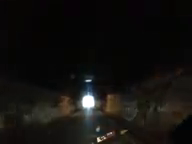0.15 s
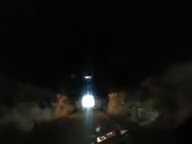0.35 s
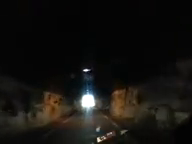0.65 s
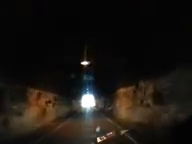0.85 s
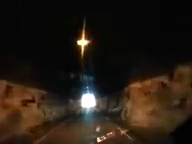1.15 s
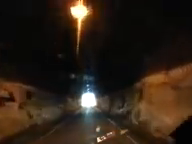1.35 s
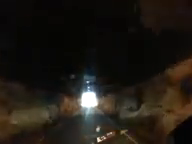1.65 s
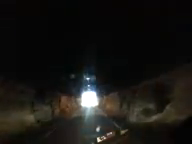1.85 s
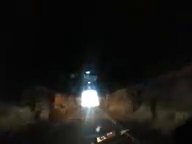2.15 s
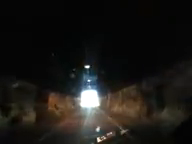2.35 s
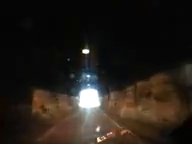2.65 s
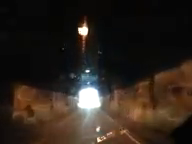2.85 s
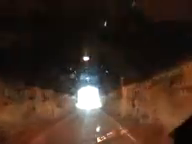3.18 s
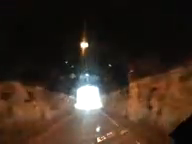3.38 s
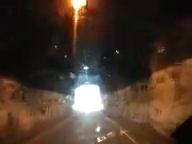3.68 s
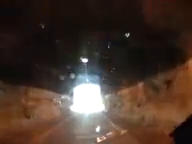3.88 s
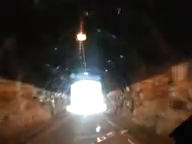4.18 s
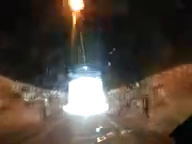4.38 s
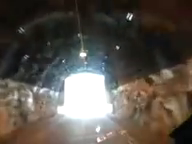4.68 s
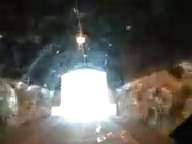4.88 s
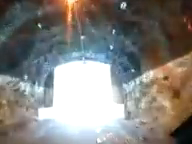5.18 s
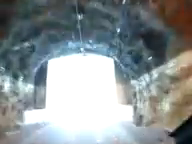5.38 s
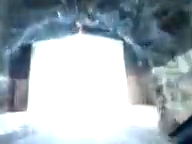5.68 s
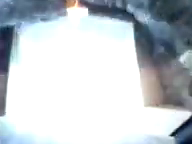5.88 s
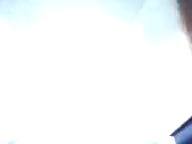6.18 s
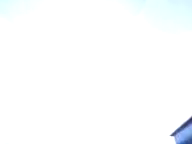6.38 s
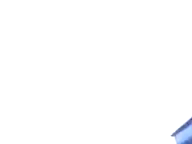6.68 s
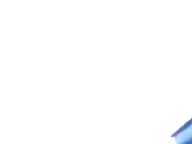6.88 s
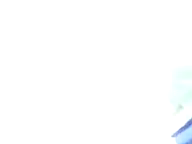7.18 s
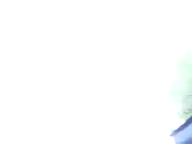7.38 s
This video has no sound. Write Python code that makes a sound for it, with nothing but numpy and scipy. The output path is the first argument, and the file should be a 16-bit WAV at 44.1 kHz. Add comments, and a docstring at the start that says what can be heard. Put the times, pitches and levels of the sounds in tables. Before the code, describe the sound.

Inside a car driving through a road tunnel, tyres rumble and the engine drones, easing off and picking up, with a few bumps and knocks.

```python
"""Tyres on coarse asphalt, heard inside a car in a road tunnel: the body booms and the tread rushes. The engine
drones, drops away as the driver lifts off, then picks up; late on, the cabin rings louder. Meshing gear teeth
add a thin whine, and stones pop under the tyres. Bumps thump through the body and knock something loose. The
plastic trim ticks and bits of metal jingle over a faint hiss."""
import sys
import numpy as np
from scipy import signal
from scipy.fft import rfft, irfft, next_fast_len
from scipy.io import wavfile
from scipy.ndimage import map_coordinates

SR = 44100
rng = np.random.default_rng(int(sys.argv[2]) if len(sys.argv) > 2 else 0)


def master(y):
    """Save y as 16-bit WAV."""
    cut = np.clip(np.atleast_2d(y).T, -1, 1)
    pcm = np.round(cut * 32767)  # scale
    wavfile.write(sys.argv[1], SR, pcm.astype(np.int16))


N = 332504
EASE_S = 3.26  # when the road noise and gear whine begin to fade and the hiss begins to rise


def amp(db):
    """Turn decibels into a gain. A fade of amp(-60 * t / t60) loses 60 dB in t60 seconds."""
    return 10 ** (np.asarray(db) / 20)


def unit(x):
    """Scale a signal to an average (rms) level of 1."""
    return x / np.sqrt(np.mean(x ** 2) + 1e-20)


def along(points, hz):
    """Read between (Hz, value) points on a logarithmic frequency scale."""
    freqs, values = np.transpose(points)
    return np.interp(np.log(hz + 1), np.log(freqs + 1), values)


def curves(rows):
    """Join rows that begin with a time into one curve for each further column."""
    times, *columns = np.transpose(rows)
    return [np.interp(np.arange(N) / SR, times, column) for column in columns]


def wobble(rate):
    """A smooth random curve that passes through `rate` new values a second."""
    values = rng.standard_normal(int(N * rate / SR) + 4)
    return map_coordinates(values, [np.arange(N) * rate / SR])


def ramp(start_s, length_s):
    """Rise from 0 at start_s to 1 over length_s."""
    return np.clip((np.arange(N) / SR - start_s) / length_s, 0, 1)


def add(track, start_s, sound):
    """Mix a short sound into a track."""
    part = track[..., round(start_s * SR):][..., :sound.shape[-1]]
    part += sound[..., :part.shape[-1]]


def filtered(x, response):
    """Filter x with a response: a function that gives the gain at each frequency."""
    size = next_fast_len(N + SR // 2)
    return irfft(rfft(x, size) * response(np.fft.rfftfreq(size, 1 / SR)), size)[..., :N]


def colour(points):
    """A response drawn through (Hz, dB) points."""
    return lambda hz: amp(along(points, hz))


def resonances(peaks):
    """A response with a steep-sided peak for each (centre Hz, width Hz, dB)."""
    return lambda hz: sum(amp(db) / (1 + ((hz - mid) / width) ** 2) ** 1.5 for mid, width, db in peaks)


# How alike left and right sound. Each row: frequency in Hz, likeness (1 the same, -1 opposite).
LIKENESS = [(50, 1), (110, 0.89), (220, 0.55), (310, 0.77), (500, 0.57), (720, 0.34), (900, 0.11),
            (1100, -0.14), (1380, -0.44), (1800, -0.43), (2300, 0.039), (3000, 0.048), (3800, -0.023)]

def cabin(pair, response):
    """Filter two unrelated signals and blend them into sound that fills the cabin, left and right."""
    def blend(hz):
        angle = np.arccos(np.clip(along(LIKENESS, hz), -1, 1)) / 2
        return response(hz) * np.array([np.cos(angle), np.sin(angle)])
    mid, side = filtered(pair, blend)
    return np.array([mid + side, mid - side])


def rush(response, drive=1):
    """Stereo cabin noise, shaken by drive, with an average level of 1."""
    return unit(cabin(drive * rng.standard_normal((2, N)), response))


def burst(envelope, spectrum):
    """Noise shaped in time and then filtered, so its edges are as dull as the rest."""
    response = colour(spectrum)
    average_gain = np.sqrt(np.mean(response(np.linspace(0, SR / 2, 4096)) ** 2))
    return cabin(envelope * rng.standard_normal((2, N)), response) / average_gain


# The tone of the hiss. Each row: frequency in Hz, relative level in dB.
HISS_TONE = [(3000, 0), (6200, -11.5), (7800, -3), (9500, -1), (14500, -2.5)]

def hiss(db=-60.0, rise_db=2.5, rise_s=0.97):
    """A faint, high hiss comes up a little as the road noise eases."""
    return amp(db + rise_db * ramp(EASE_S, rise_s)) * rush(colour(HISS_TONE))


# Shivers of metal. Each row: start in seconds, level in dB, rise time and fade time in seconds.
JINGLES = [(2.225, -57, .012, .2), (2.655, -54, 0.0055, 0.18), (3.899, -56.5, 0.0022, .06),
           (4.245, -46.5, 0.034, 0.39), (6.995, -49.5, 0.014, 0.23)]
# Their bright ring. Each row: frequency in Hz, relative level in dB.
METAL_TONE = [(3000, -30), (5500, -7), (8500, 1), (11500, -1), (14500, -6)]

def jingle(grain_db=4):
    """Small metal pieces shiver in a spray of tiny contacts when the car is shaken."""
    shake, t = np.zeros(N), np.arange(SR // 2) / SR
    for start_s, db, rise_s, t60 in JINGLES:
        add(shake, start_s, amp(db - 60 * t / t60) * (1 - np.exp(-t / rise_s)) ** 2)
    return burst(shake * amp(grain_db * wobble(350)), METAL_TONE)


def chink(start_s=7.021, hz=7720, width_hz=380, db=-48, t60=0.07):
    """A small piece of metal chinks along with the second knock."""
    envelope, t = np.zeros(N), np.arange(SR // 4) / SR
    add(envelope, start_s, amp(db - 60 * t / t60) * (1 - np.exp(-t / 0.00098)))
    return envelope * rush(resonances([(hz, width_hz, 0)]))


# Ticks of the trim. Each row: start in seconds, relative level in dB, pitch in Hz.
TRIM_TICKS = [(2.66, -47, 3700), (3.104, -29.5, 2050), (3.106, -48, 4500), (3.695, -37, 2900),
              (3.711, -30, 2180), (3.901, -48, 3700), (4.221, -30, 1900), (4.354, -40, 3200),
              (4.44, -27.5, 2420), (4.499, -49, 3600), (5.153, -44, 3800), (5.484, -43, 3300),
              (6.431, -31.5, 2050), (7.025, -35.5, 2920), (7.343, -39, 3220), (7.446, -32, 2450),
              (7.504, -31, 1900), (7.522, -40, 3200)]

def ticks(gain_db=-3, t60=0.039, spread=0.99):
    """Plastic trim slips in brief bursts, each a ringing band of noise over a woody low end."""
    out, t = np.zeros((2, N)), np.arange(SR // 8) / SR
    for start_s, db, hz in TRIM_TICKS:
        cut_highs = signal.butter(6, hz * 1.23, fs=SR)
        cut_lows = signal.butter(1, hz / 2, "highpass", fs=SR)
        band = signal.butter(2, [hz / 1.11, hz * 1.11], "bandpass", fs=SR)
        centre = rng.standard_normal((2, 1, len(t)))  # the same in both ears
        sides = spread * rng.standard_normal((2, 2, len(t)))
        scrape = signal.lfilter(*cut_highs, centre + sides)
        woody = unit(signal.lfilter(*cut_lows, scrape[0]))
        ring = unit(signal.lfilter(*band, scrape[1]))
        envelope = amp(db + gain_db - 60 * t / t60) * (1 - np.exp(-t / 0.00058))
        add(out, start_s, (woody + ring) * envelope)
    return out


# Knocks. Each row: start in seconds, level in dB, pitch multiplier, treble cut-off in Hz.
KNOCKS = [(4.2766, -13, 0.96, 3800), (7.019, -16, .87, 776)]
# The loose object's notes. Each row: pitch in Hz, relative level in dB, fade time in seconds.
OBJECT_NOTES = [(362, -9, 0.12), (694, -9.5, 0.076), (815, -4.5, 0.11), (876, -2.5, 0.093),
                (1225, -6.5, 0.057), (1476, -8.5, 0.051), (2130, -16, 0.04), (2450, -16, 0.043),
                (3150, -24, .04)]
# The dull crack of a contact. Each row: frequency in Hz, relative level in dB.
CRACK_TONE = [(30, -40), (200, -4), (900, 2.5), (2300, -7.5), (4000, -21), (6000, -30), (12000, -28)]

def knocks(ring_db=-2.5, crack_db=-7, crack_t60=0.063, gap_s=0.0036, gap_growth=3.1, loss_db=11):
    """A loose object hits the trim three times a knock, ringing and cracking; soft hits sound rounder."""
    out, t = np.zeros((2, N)), np.arange(SR // 4) / SR
    attack = (1 - np.exp(-t / 0.00078)) ** 2
    for start_s, first_db, ratio, cutoff_hz in KNOCKS:
        ring, cracks = np.zeros((2, N)), np.zeros(N)
        for hit in range(3):
            hit_s = start_s + gap_s * np.sum(gap_growth ** np.arange(hit))
            hit_db = first_db - loss_db * hit
            for hz, note_db, t60 in OBJECT_NOTES:
                phase = 2 * np.pi * hz * ratio * (t + hit_s - start_s) + rng.normal(0, 0.21, (2, 1))
                add(ring, hit_s, amp(hit_db + note_db - 60 * t / t60) * attack * np.sin(phase))
            add(cracks, hit_s, amp(hit_db + crack_db - 60 * t / crack_t60))
        rattle = amp(ring_db) * ring + burst(cracks, CRACK_TONE)
        out += signal.lfilter(*signal.butter(2, cutoff_hz, fs=SR), rattle)
    return out


# Bumps in the road. Each row: start in seconds, level in dB, fade time in seconds.
BUMPS = [(3.682, -25.5, 0.43), (4.276, -20.5, 0.73), (4.72, -31, 0.53), (6.718, -23, 0.088),
         (7.019, -23.5, 0.35)]
# The body's answer to a jolt. Each row: frequency in Hz, relative level in dB.
JOLT_TONE = [(30, -48), (60, -27), (115, -2.5), (190, -11.5), (280, -2), (400, -6), (540, -21),
             (900, -15.5), (2500, -32), (5000, -49.5), (12000, -74)]

def thumps(rear_delay_s=0.175, rear_db=-12):
    """Each bump jolts the front wheels, then the rear ones more softly, and the body booms."""
    jolts, t = np.zeros(N), np.arange(SR) / SR
    for start_s, db, t60 in BUMPS:
        jolt = amp(db - 60 * t / t60) * (1 - np.exp(-t / 0.00077))
        add(jolts, start_s, jolt)
        add(jolts, start_s + rear_delay_s, amp(rear_db) * jolt)
    return burst(jolts, JOLT_TONE)


# Stones the tyres hit. Each row: time in seconds, peak level in dB.
STONES = [(0.074, -19), (0.539, -19), (0.762, -26), (1.015, -23), (1.225, -19.5), (1.4935, -16.5),
          (1.964, -24), (2.173, -22), (2.842, -21), (3.635, -16), (5.282, -23), (5.544, -24), (6.438, -20),
          (7.012, -16)]
# The tone of one pop. Each row: frequency in Hz, relative level in dB.
POP_TONE = [(20, -41), (80, -13), (250, 3), (800, 5), (1400, -8), (3000, -20.5), (4500, -44), (7000, -68)]

def stones():
    """Single stones that stick up from the road pop under the tyres."""
    hits, pop = np.zeros(N), colour(POP_TONE)
    for hit_s, db in STONES:
        hits[round(hit_s * SR)] += amp(db)
    return filtered(hits, lambda hz: pop(hz) / pop(hz).mean())


# A cabin resonance, then a faint high whistle. Each row: pitch in Hz, width in Hz, level in dB.
RING_AND_WHISTLE = [(706, 11, -43), (2390, 50, -53.5)]

def ring_and_whistle(start_s=6.0, end_s=7.4, fade_s=0.11):
    """A cabin resonance rings louder, with a faint high whistle, from 6.0 s to 7.4 s."""
    notes = [amp(db) * rush(resonances([(hz, width, 0)])) for hz, width, db in RING_AND_WHISTLE]
    envelope = ramp(start_s, fade_s) * (1 - ramp(end_s - fade_s, fade_s))
    return envelope * sum(notes)


def whine(hz, db, waver_db, roughness):
    """Meshing gear teeth sing a thin, unsteady note."""
    phase = 2 * np.pi * np.cumsum(hz) / SR + roughness * wobble(30)
    return np.sqrt(2) * amp(db + waver_db * wobble(7)) * np.sin(phase)


# The gear note while coasting. Each row: time in seconds, pitch in Hz, level in dB.
COAST_NOTE = [(4.2, 541, -60), (4.33, 536, -34.5), (4.46, 531, -32), (4.56, 526, -42), (4.72, 520, -40.5),
              (5.0, 517, -36.5), (5.15, 504, -45), (5.4, 494.7, -39), (5.7, 475, -40), (6.4, 455.6, -46),
              (6.7, 450, -63)]

def gears(teeth_per_firing=9, drive_db=-44, release_s=0.65):
    """One note follows the engine, then fades; a lower one sags and fades as the car coasts."""
    firing_hz, = curves(ENGINE_SPEED)
    driving = whine(teeth_per_firing * firing_hz, drive_db, waver_db=4.0, roughness=0.4)
    coasting = whine(*curves(COAST_NOTE), waver_db=0.3, roughness=0.89)
    return driving * (1 - ramp(EASE_S, release_s)) + coasting


# Cruising, slowing and picking up. Each row: time in seconds, firings per second.
ENGINE_SPEED = [(0, 73.64), (1.2, 72.9), (2.3, 74.22), (3.6, 73.06), (4.05, 56.1), (4.5, 47.52),
                (5.45, 49.5), (5.97, 78.88), (6.5, 75.73), (7.25, 75.1), (7.54, 71.1)]
# The throttle. Each row: time in seconds, opening from 0 (closed) to 1 (open).
THROTTLE = [(0, 1), (3.6, 1), (3.95, 0.05), (5.55, 0), (6.05, 1), (7.25, 1), (7.54, .4)]
# The tones of the drone. Each row: multiple of the firing rate, relative level in dB.
ENGINE_TONES = [(1, -6), (1.5, -18.5), (2, -1), (2.5, -13), (3, -5), (4, -7.5), (5, -5), (6, -15)]
# The cabin's air booms when a tone sweeps through certain pitches. Each row: pitch in Hz, boost in dB.
CABIN_BOOST = [(47, -18), (62, -0.5), (75, -1.5), (110, -10.5), (134, 3), (146, -1), (160, -1), (205, -5.5),
               (220, 2), (229, 3), (290, -0.5)]
# Where the engine block rings. Each row: pitch in Hz, width in Hz, relative level in dB.
BLOCK_RING = [(2026, 51, 0), (2890, 660, -12)]

def engine(db=-34, clatter_db=-19.0, drone_drop_db=4.5, clatter_drop_db=8.5, flutter_db=1.2):
    """Firings drone into the cabin and rattle the block; both sink when the throttle closes."""
    firing_hz, = curves(ENGINE_SPEED)
    closed = 1 - curves(THROTTLE)[0]
    unsteady_hz = firing_hz * (1 + 0.0019 * wobble(14))
    phase = 2 * np.pi * np.cumsum(unsteady_hz) / SR
    drone = np.zeros(N)
    for multiple, tone_db in ENGINE_TONES:
        boost_db = along(CABIN_BOOST, multiple * firing_hz)
        level_db = tone_db + boost_db + flutter_db * wobble(6.7) - drone_drop_db * closed
        drone += np.sqrt(2) * amp(level_db) * np.sin(multiple * phase + rng.uniform(0, 2 * np.pi))
    pulses = rng.standard_normal(N) * (1 + 0.35 * np.cos(phase))  # noise swells at each firing
    clatter = unit(filtered(pulses, resonances(BLOCK_RING)))
    clatter_gain = amp(clatter_db - clatter_drop_db * closed + 1.5 * wobble(4.2))
    lean_left = amp([[1.5], [-1.5]])
    return amp(db) * (drone + clatter_gain * clatter * lean_left)


def road_gain(db, drop_db, coarse_db, fall_start_s=EASE_S, fall_s=1.8):
    """Road noise swells on a stretch of coarser asphalt and sinks as the car slows."""
    coarse = np.exp(-((np.arange(N) / SR - 2.32) / 0.55) ** 2)  # strongest at 2.32 seconds
    return amp(db + coarse_db * coarse - drop_db * ramp(fall_start_s, fall_s))


# The boom of the car's body. Each row: frequency in Hz, relative level in dB.
BOOM_TONE = [(15, -42), (32, -19), (58, -14.5), (88, -10), (115, -5), (150, -3.5), (210, -3.5), (300, -1.5),
             (400, -0.5), (450, -3.5), (600, -5.5), (800, -16.5), (1200, -26), (2500, -80.5)]
# Air ringing in the cabin and tyres. Each row: pitch in Hz, width in Hz, relative level in dB.
AIR_RING = [(116, 6.9, 4), (183.4, 23, -0.5), (236.8, 9.4, 4.5), (255.8, 9.5, 2.5), (290.4, 19, -1),
            (331, 45, -3.5), (382, 20, -1.5), (470, 36, -6.5), (713.6, 16, -7)]
# The rush of the tyre tread. Each row: frequency in Hz, relative level in dB.
TREAD_TONE = [(250, -37), (550, -12.5), (730, 0), (950, -1.5), (1250, -4), (1600, -9), (2200, -14),
              (2900, -18), (3400, -22.5), (4000, -32), (5000, -37.5), (6000, -55), (8000, -84)]

def road(grit_db=0.27, patch_db=0.32, ring_swing_db=0.9):
    """Coarse asphalt shakes the body and rings the cabin; the tread rushes over its stones."""
    grit = amp(grit_db * wobble(300))
    boom = road_gain(db=-27.5, drop_db=1.5, coarse_db=0.28) * rush(colour(BOOM_TONE), grit)
    # As the car slows, the ringing holds on longer than the rest.
    ring_gain = road_gain(db=-28, drop_db=4.5, coarse_db=1.12, fall_start_s=4.4, fall_s=0.98)
    ring = ring_gain * amp(ring_swing_db * wobble(5)) * rush(resonances(AIR_RING))
    tread = road_gain(db=-32.5, drop_db=3, coarse_db=0.77) * rush(colour(TREAD_TONE), grit)
    return amp(patch_db * wobble(7.8)) * (boom + ring + tread)


def scene():
    """Everything as heard behind the windscreen; the boom is slightly louder on the right."""
    car = road() + stones() + engine() + ring_and_whistle() + gears()
    rattles = knocks() + thumps() + ticks() + chink() + jingle()
    # Each pair: frequency in Hz, left level minus right level in dB.
    balance = [(200, -1.3), (1000, -0.31), (2200, 0.51), (5000, -0.47), (12000, -0.8)]
    return filtered(car + rattles + hiss(), lambda hz: amp(np.outer([0.5, -0.5], along(balance, hz))))


def record(dry):
    """Cut away the highest treble, above 14600 Hz."""
    return filtered(dry, lambda hz: hz < 14600)


dry = scene()
out = record(dry)
master(out)
```